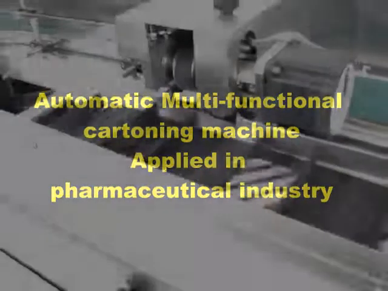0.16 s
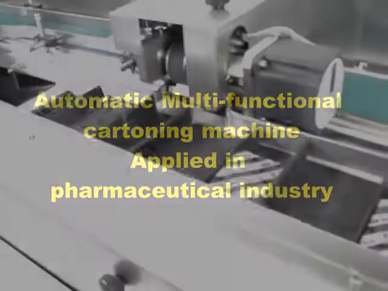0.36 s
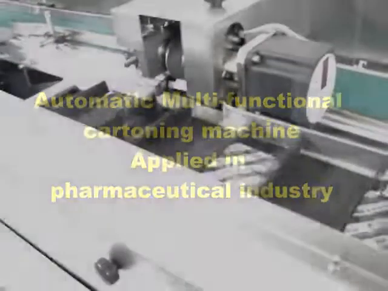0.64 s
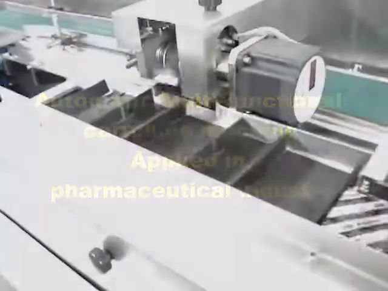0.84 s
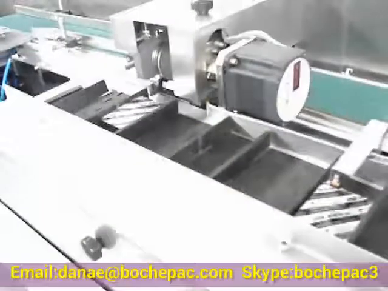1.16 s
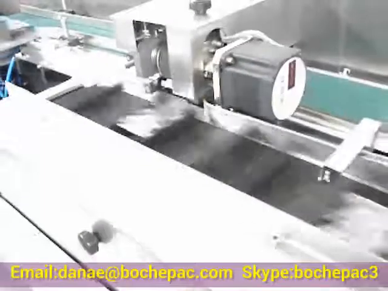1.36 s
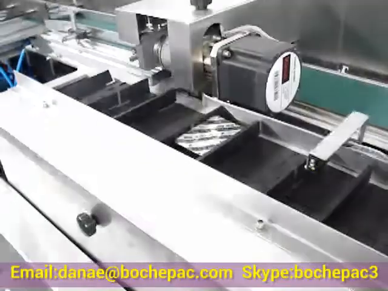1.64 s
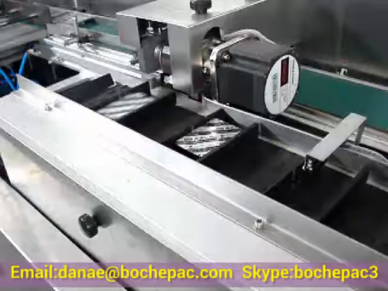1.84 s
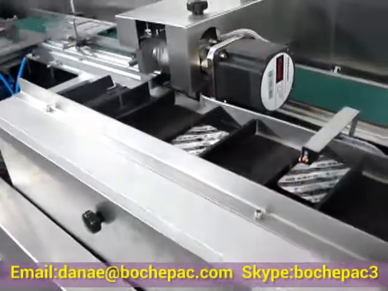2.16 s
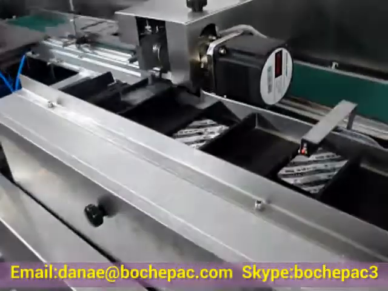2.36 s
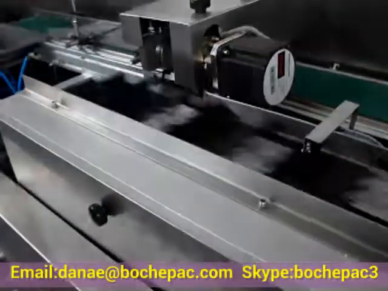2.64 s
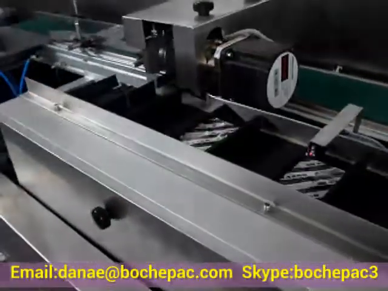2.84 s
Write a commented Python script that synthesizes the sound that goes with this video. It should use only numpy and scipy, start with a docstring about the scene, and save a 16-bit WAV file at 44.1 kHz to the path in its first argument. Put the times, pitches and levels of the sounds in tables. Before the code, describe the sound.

Cartoning machine running nearby: dense chain rattle, metallic clacks, regular whistling air hisses and brief motor hums.

```python
"""A hard factory hall: a cartoning machine runs close by, one cycle about every 0.65 s.
Chain and gears rumble and rattle as shaped noise, loose links tick as small decaying tones, and levers
and pushers clack on the steel frame as noise bursts with a ringing tone. Each cycle brings a short puff of
air, a longer whistling hiss (probably the suction valve) of narrow noise bands, and in most the brief
gliding hum of the feed motor. Guides ring, a pusher scrapes once, and a short diffuse tail answers."""
import sys
import numpy as np
from scipy import signal
from scipy.fft import rfft, irfft, next_fast_len
from scipy.io import wavfile
from scipy.ndimage import map_coordinates

SR = 44100
rng = np.random.default_rng(int(sys.argv[2]) if len(sys.argv) > 2 else 0)


def put_to_file(sound):
    """Save the sound as 16-bit audio at rate SR, in the file named by the first command-line argument."""
    columns = np.atleast_2d(sound).T  # one column per channel
    safe = np.clip(columns, -1, 1)
    whole_steps = np.round(safe * 32767)
    wavfile.write(sys.argv[1], SR, whole_steps.astype(np.int16))


N = 132741  # length in samples

# Running noise of chain and gears, before the trims below.
# Each row: time in seconds, then bass, middle and upper middle level in dB.
RUNNING_LEVELS = [(0.0, -34, -24, -24), (0.65, -30.5, -19, -21.5), (0.94, -25.5, -19, -16.5),
                  (1.01, -27.5, -21, -17.5), (1.23, -29, -17, -19), (1.66, -25.5, -18, -16.5),
                  (1.76, -23.5, -17.5, -16), (1.89, -33.5, -18, -15.5), (1.94, -35, -20, -17),
                  (1.96, -27, -19.5, -22.5), (1.98, -34.5, -17.5, -16.5), (2.09, -28.5, -18.5, -24),
                  (2.32, -37, -26.5, -21), (2.37, -29, -22, -25.5), (2.62, -31, -23, -22),
                  (2.65, -31, -18.5, -24), (2.67, -36, -21.5, -23.5), (2.74, -31.5, -22, -23.5),
                  (2.85, -36, -20.5, -21.5), (2.87, -32, -26, -23.5), (3.01, -33, -25.5, -21.5)]
# Tone of the gear rumble. Each row: frequency in Hz, relative gain in dB.
RUMBLE_TONE = [(15, -53), (25, -15), (70, -24.5), (108, -11.5), (181, -9.5), (343, -4.5), (377, -9),
               (522, 0.5), (606, -2), (640, -8), (830, -17), (1410, -120)]
# Tone of the rattling body. Each row: frequency in Hz, relative gain in dB.
BODY_TONE = [(240, -28), (400, -12), (526, -11), (761, -0.5), (826, -3), (1490, -2.5), (1820, -2.5),
             (2240, -3.5), (2570, -5.5), (3380, -6), (8320, -18), (9810, -19), (10500, -59), (13600, -77),
             (22000, -120)]
BASS_TRIM_DB, MIDDLE_TRIM_DB, UPPER_TRIM_DB, SPLIT_HZ = -2.5, -2, -2, 2110
# Resonances of the steel frame. Each row: centre in Hz, width in Hz, relative gain in dB.
FRAME_MODES = [(346, 33, -4), (528, 37, 5), (834, 65, -4.5), (1020, 40, -15.5), (1360, 85, -4.5),
               (1527, 29, 4.5), (2220, 160, 1), (2684, 72, 5.5), (3370, 140, -4), (4550, 70, -27)]
FRAME_TRIM_DB = -7
RATTLE_PER_S, RATTLE_SPREAD_DB, RATTLE_T60_S, RATTLE_POWER_SHARE = 220, 0.5, 0.03, 0.3

# Loose links: LINK_DB is set against the mean of the middle and upper running levels.
LINKS_PER_S, LINK_HZ, LINK_SPREAD_OCT, LINK_T60_S, LINK_DB = 260, 1800, 1.4, 0.075, -5

# Exhaust puffs. Each row: start in seconds, length in seconds, level in dB.
PUFF_TIMES = [(0.028, 0.023, -27), (0.668, 0.028, -25), (1.321, 0.039, -27), (1.964, 0.051, -30.5),
              (2.614, 0.021, -26)]
# Tone of rushing air. Each row: frequency in Hz, relative gain in dB.
AIR_TONE = [(1500, -46), (4000, -5), (7000, 9), (9000, 3.5), (10500, -22.5)]
PUFF_RAMP_S = 0.0025

# Lever and pusher blows. Each row: start in seconds, level in dB before the clack trim and the attack,
# treble against body in dB, T60 in seconds, ring of the struck part in Hz.
BLOWS = [(0.05, -4.5, -13, 0.067, 1000), (0.249, -7.5, -3.5, 0.11, 2010), (0.522, -5, -24, 0.11, 1353),
         (0.556, -5, -11, 0.11, 946), (0.7, -2.5, -23, 0.12, 2100), (0.746, -3.5, 0, 0.07, 2300),
         (0.837, -2.5, -28, 0.07, 1400), (0.878, -5.5, -12, 0.14, 1806), (0.899, -6.5, 3, .07, 2050),
         (0.971, -5.5, -2, .06, 3320), (1.123, -4.5, -8, 0.12, 2890), (1.203, 0, -25, 0.099, 950),
         (1.253, -2, -3, 0.058, 2206), (1.326, -4.5, -5, .08, 2300), (1.355, -0.5, -13, 0.058, 2470),
         (1.391, 1, -3, 0.068, 2290), (1.55, -14.5, 12, 0.069, 1510), (1.766, -6.5, -1, .08, 2710),
         (1.881, 0, -13, 0.045, 2300), (1.898, -6.5, -12, .05, 3380), (1.912, -1.5, -8, 0.047, 2250),
         (1.921, -9.5, -9, 0.061, 3320), (1.992, -1.5, -21, 0.13, 1944), (2.036, -8, 5.5, 0.072, 2500),
         (2.097, -6.5, -21, 0.064, 1350), (2.166, -13, 3, 0.067, 2270), (2.2, -14, 6.5, .07, 2320),
         (2.456, -6, -7.5, 0.076, 1055), (2.514, -12, -4, 0.14, 2200), (2.64, -4, -20, 0.096, 1700),
         (2.689, 1.5, -4.5, 0.028, 1290), (2.78, -5, -11, 0.15, 1894), (2.84, -7, -3, 0.086, 1700),
         (2.912, -11, -3, 0.04, 3600)]
# Dull body of a clack. Each row: frequency in Hz, relative gain in dB.
THUD_TONE = [(60, -39), (250, -6.5), (600, -9.5), (1400, 1.5), (2400, 0.5), (4000, -12), (7000, -12.5),
             (10000, -16)]
# Bright edge of a clack. Each row: frequency in Hz, relative gain in dB.
CRACK_TONE = [(1200, -27), (2500, -10), (4000, -4.5), (6000, -3), (10000, -23)]
CLACK_TRIM_DB, CLACK_RISE_S, RING_TRIM_DB, RING_WAVER_HZ = -9.5, 0.001, -4, 220.7

# Air valve openings. Each row: start in seconds, length in seconds, level in dB before sag and lift.
VALVE_OPENINGS = [(0.131, 0.38, -27), (0.779, 0.38, -25.5), (1.435, 0.38, -25.5), (2.35, 0.13, -30.5),
                  (2.705, 0.32, -31.5)]
# Whistles of the nozzle. Each row: centre in Hz, width in Hz, relative gain in dB.
NOZZLE_MODES = [(6050, 60, -0.5), (6555, 90, -0.5), (6890, 99, 1), (7270, 150, -1.5), (7640, 90, -1.5),
                (8240, 100, -3), (9230, 110, -6)]
HISS_RISE_S, HISS_FALL_S, HISS_SAG_DB_PER_S, HISS_LIFT_DB = 0.039, 0.062, -3, 3.5
HISS_AIR_DB, NOZZLE_FLUTTER_DB, NOZZLE_DRIFT = -11.5, 3, 0.005  # drift as a share of the pitch

# Feed motor steps. Each row: start in seconds, level in dB, Hz below its note at the start.
FEED_STEPS = [(0.378, -23, 30), (1.005, -22, 90), (1.666, -20, 15), (2.966, -26.5, 50)]
FEED_HZ, FEED_S, FEED_RAMP_S, FEED_SPINUP_S = 677, 0.115, 0.032, 0.025
FEED_WAVER_HZ, FEED_FLUTTER_DB = 15, 2.5

# Rings of rubbing guides. Each row: start in seconds, length in seconds, pitch in Hz, peak level in dB.
GUIDE_RINGS = [(0.45, 0.05, 3310, -28), (.535, .06, 3380, -28), (1.075, .035, 5510, -27),
               (1.203, .04, 1515, -16.5), (1.232, 0.03, 4550, -26), (1.484, 0.046, 1500, -21.5),
               (1.848, 0.025, 1510, -18), (1.888, 0.05, 1210, -21)]

# Tone of the sliding pusher. Each row: centre in Hz, width in Hz, relative gain in dB.
SCRAPE_MODES = [(1300, 200, -3), (2330, 260, 2.5), (3200, 250, 0), (3520, 210, 0)]
SCRAPE_AT_S, SCRAPE_S, SCRAPE_DB, SCRAPE_GRAIN_DB = 1.88, 0.072, -19.5, 3.5

# Stereo width of the noises. Each row: frequency in Hz, left-right correlation from 0 to 1.
LIKENESS = [(30, .99), (100, 0.9), (500, 0.99), (2000, 0.99), (8000, 0.95)]
HALL_T60_S, HALL_DB, LEFT_DB = 0.15, -5.5, -0.22
TOP_HZ, CEILING = 10150, 0.85


def amp(db):
    """Decibels to gain."""
    return 10 ** (np.asarray(db) / 20)


def unit(x):
    """Scale to rms 1."""
    return x / np.sqrt(np.mean(x ** 2) + 1e-20)


def along(points, hz):
    """Read (Hz, value) points on a log frequency axis."""
    f, v = np.transpose(points)
    return np.interp(np.log(hz + 1), np.log(f + 1), v)


def clock():
    """Time of each sample in seconds."""
    return np.arange(N) / SR


def wobble(rate):
    """A smooth random curve around 0 with rate knots a second."""
    return map_coordinates(rng.standard_normal(2000), [clock() * rate], mode="wrap")


def tone(hz):
    """A sine that follows a moving pitch, by summing its phase."""
    return np.sin(2 * np.pi * np.cumsum(hz) / SR)


def filtered(x, response):
    """Shape x by a gain over frequency, padded so that its end does not wrap round."""
    m = next_fast_len(N + SR // 2)
    return irfft(rfft(x, m) * response(np.fft.rfftfreq(m, 1 / SR)), m)[..., :N]


def rush(gain):
    """Nearly mono stereo noise of rms 1: a mid and a side noise mixed to the wanted correlation."""
    def mid_side_gain(f):
        turn = np.arccos(np.clip(along(LIKENESS, f), -1, 1)) / 2
        return gain(f) * np.array([np.cos(turn), np.sin(turn)])
    mid, side = filtered(rng.standard_normal((2, N)), mid_side_gain)
    return unit(np.array([mid + side, mid - side]))


def colour(points):
    """Gain curve of a drawn spectrum."""
    return lambda f: amp(along(points, f))


def resonances(modes):
    """Gain curve of damped resonators whose powers add."""
    def gain(f):
        peaks = [amp(db) * f * w / (c * c - f * f + 1j * f * w) for c, w, db in modes]
        return np.sqrt(sum(abs(peak) ** 2 for peak in peaks))
    return gain


def gate(start, length, ramp):
    """Rise, hold and fall; the ramps are centred on start and end."""
    t = clock() - start
    return np.clip(np.minimum(t, length - t) / ramp + 0.5, 0, 1)


def rattle():
    """Many small random contacts, each with decaying power, over a steady part."""
    chance, size = rng.random(N), rng.standard_normal(N)
    hits = (chance < RATTLE_PER_S / SR) * amp(RATTLE_SPREAD_DB * np.clip(size, -2, 2)) ** 2
    decay = amp(-60 * clock() / RATTLE_T60_S) ** 2
    power = abs(signal.fftconvolve(hits, decay)[:N])
    return np.sqrt(1 - RATTLE_POWER_SHARE + RATTLE_POWER_SHARE * power / power.mean())


def drive():
    """Chain and gears: a rumble, a rattling body in two bands, and the frame ringing along."""
    s, *levels = np.transpose(RUNNING_LEVELS)
    bass, middle, upper = [amp(np.interp(clock(), s, level)) for level in levels]
    low = lambda f: 1 / (1 + (f / SPLIT_HZ) ** 8)  # share of power below the split
    rumble = amp(BASS_TRIM_DB) * bass * rush(colour(RUMBLE_TONE))
    body = amp(MIDDLE_TRIM_DB) * middle * rush(lambda f: colour(BODY_TONE)(f) * np.sqrt(low(f)))
    body += amp(UPPER_TRIM_DB) * upper * rush(lambda f: colour(BODY_TONE)(f) * np.sqrt(1 - low(f)))
    frame = amp(FRAME_TRIM_DB) * middle * rush(resonances(FRAME_MODES))
    return rumble + rattle() * body + frame


def links():
    """Loose chain links tick at random, each a decaying sine of its own pitch."""
    t = np.arange(SR // 8) / SR
    out = np.zeros(N + len(t))
    for when, pitch, size in rng.random((int(LINKS_PER_S * N / SR), 3)):
        hz = LINK_HZ * 2 ** (LINK_SPREAD_OCT * (2 * pitch - 1))
        decay = amp(-10 * size - 60 * t / LINK_T60_S)  # ticks start up to 10 dB down
        attack = 1 - np.exp(-t * hz)
        out[int(when * N):][:len(t)] += decay * attack * np.sin(2 * np.pi * hz * t)
    s, _, middle, upper = np.transpose(RUNNING_LEVELS)
    level = amp(LINK_DB + np.interp(clock(), s, (middle + upper) / 2))
    return level * unit(out[:N])


def exhaust_puffs():
    """Short gated bursts of plain air noise, without a whistle."""
    flow = sum(amp(db) * gate(s, length, PUFF_RAMP_S) for s, length, db in PUFF_TIMES)
    return flow * rush(colour(AIR_TONE))


def clacks():
    """Levers strike the frame: a dull or bright noise burst, and the struck part rings roughly."""
    blows, bright, rings = np.zeros((3, N))
    waver = RING_WAVER_HZ * wobble(500)  # fast pitch waver roughens the ring
    for s, db, treble_db, t60, hz in BLOWS:
        t = np.maximum(clock() - s, 0)
        blow = amp(db - 60 * t / max(t60, 0.005)) * (1 - np.exp(-t / CLACK_RISE_S))
        blows += blow
        bright += blow * amp(treble_db)
        rings += blow * np.sqrt(2) * tone(hz + waver)
    thud = amp(-1.0) * rush(colour(THUD_TONE)) + amp(-14.5) * rush(resonances(FRAME_MODES))
    crack = rush(colour(CRACK_TONE))
    return amp(CLACK_TRIM_DB) * (blows * thud + bright * crack + amp(RING_TRIM_DB) * rings)


def hall(x):
    """A diffuse tail: each sound is smeared by decaying noise."""
    tail = rng.standard_normal(N) * amp(-60 * clock() / HALL_T60_S)
    return signal.fftconvolve(x, tail[None] / np.linalg.norm(tail), axes=1)[:, :N]


def nozzle_whistle(mode):
    """One narrow band of noise, read at a wavering speed so that its pitch drifts."""
    place = np.cumsum(1 + NOZZLE_DRIFT * wobble(10))
    return map_coordinates(rush(resonances([mode]))[0], [place], mode="mirror", order=2)


def valve_hiss():
    """Each hiss swells, sags and fades while the nozzle's whistles drift and trade strength."""
    t, flow = clock(), 0
    for s, length, db in VALVE_OPENINGS:
        swell = np.minimum((t - s) / HISS_RISE_S, (s + length - t) / HISS_FALL_S)
        flow = flow + amp(db + HISS_SAG_DB_PER_S * (t - s)) * np.clip(swell, 0, 1)
    flutter = lambda mode: amp(mode[2] + NOZZLE_FLUTTER_DB * wobble(16))
    whistles = unit(sum(flutter(mode) * nozzle_whistle(mode) for mode in NOZZLE_MODES))
    hiss = whistles + amp(HISS_AIR_DB) * rush(colour(AIR_TONE))
    return flow * amp(HISS_LIFT_DB + 0.92 * wobble(29.2)) * hiss


def feed_motor():
    """The motor spins up exponentially to its note, judders in pitch and level, and stops."""
    out = np.zeros(N)
    for s, db, below_hz in FEED_STEPS:
        t = np.maximum(clock() - s, 0)
        hz = FEED_HZ - below_hz * np.exp(-t / FEED_SPINUP_S) + FEED_WAVER_HZ * wobble(110)
        swell = np.clip(np.minimum(t, FEED_S - t) / FEED_RAMP_S, 0, 1)
        out += amp(db + FEED_FLUTTER_DB * wobble(110)) * swell * tone(hz)
    return np.sqrt(2) * out  # levels are rms


def guides():
    """Sliding metal rings briefly on one note, rough from fast pitch and level waver."""
    out = np.zeros(N)
    for s, length, hz, db in GUIDE_RINGS:
        note = tone(hz * (1 + 0.023 * wobble(300)))
        out += amp(db + 1.2 * wobble(120)) * gate(s, length, 0.012) * note
    return out


def pusher():
    """A pusher scrapes along its guide: resonant noise broken into coarse slips."""
    slips = unit(amp(SCRAPE_GRAIN_DB * wobble(260)))
    return amp(SCRAPE_DB) * gate(SCRAPE_AT_S, SCRAPE_S, 0.008) * slips * rush(resonances(SCRAPE_MODES))


def scene():
    """The whole machine; the hall answers its clacks, motor, guides and pusher."""
    struck = clacks() + feed_motor() + guides() + pusher()
    machine = drive() + links() + exhaust_puffs() + valve_hiss() + struck
    return (machine + amp(HALL_DB) * hall(struck)) * amp([[LEFT_DB], [-LEFT_DB]])


def record(dry):
    """Round off the highest peaks below the ceiling, then end the treble steeply around TOP_HZ."""
    soft = dry / (1 + (dry / CEILING) ** 8) ** (1 / 8)
    return filtered(soft, lambda f: np.clip((TOP_HZ - f) / 200 + 0.5, 0, 1))


dry = scene()
out = record(dry)
put_to_file(out)
```